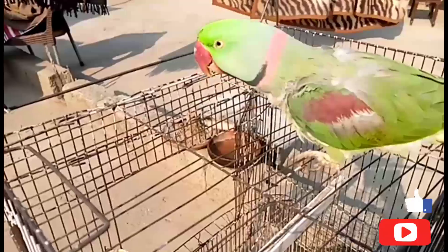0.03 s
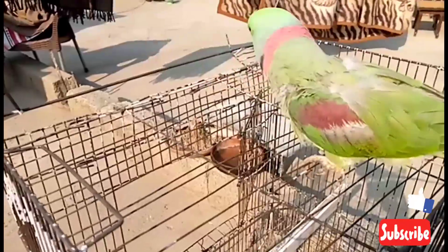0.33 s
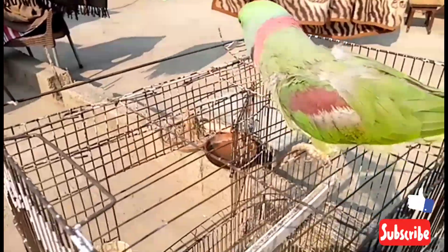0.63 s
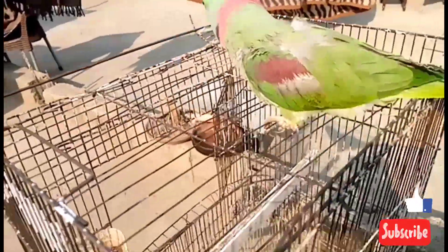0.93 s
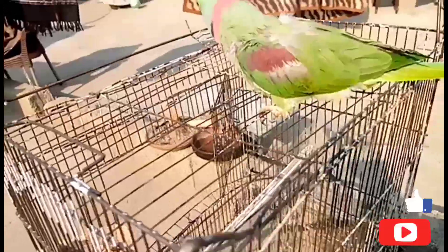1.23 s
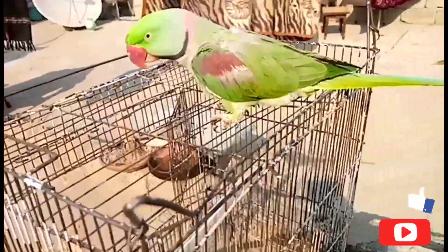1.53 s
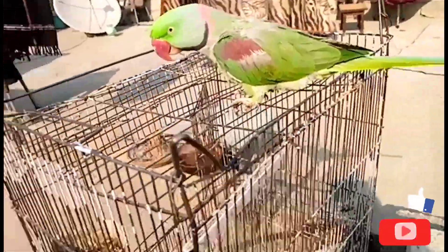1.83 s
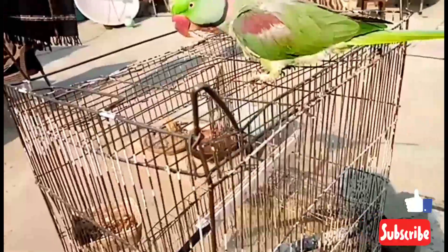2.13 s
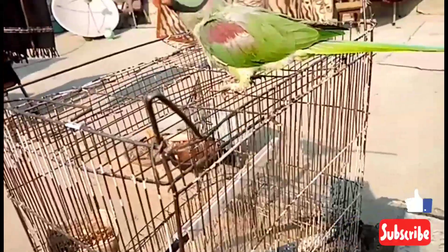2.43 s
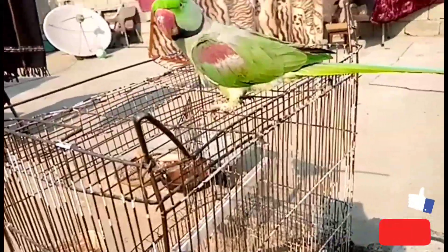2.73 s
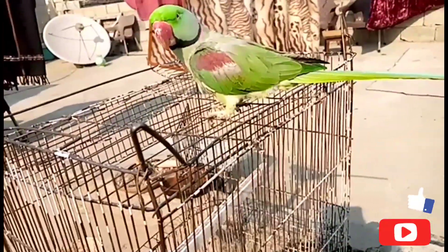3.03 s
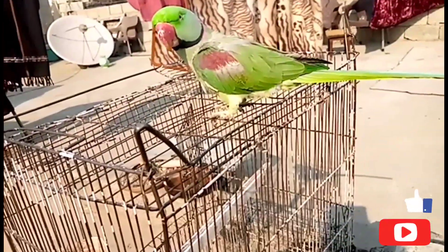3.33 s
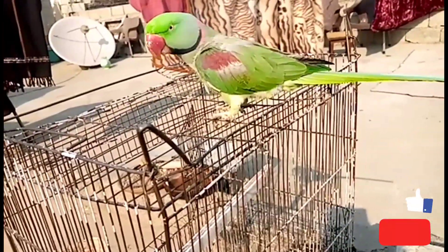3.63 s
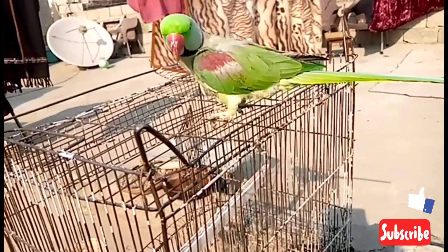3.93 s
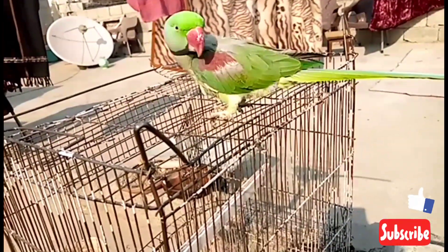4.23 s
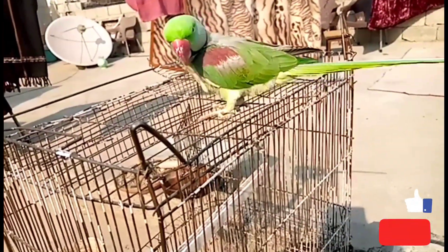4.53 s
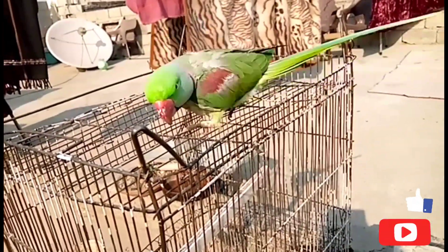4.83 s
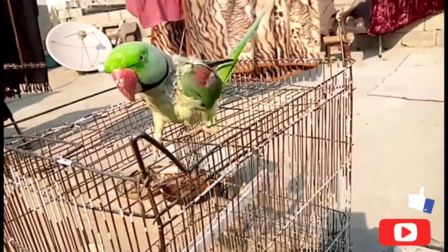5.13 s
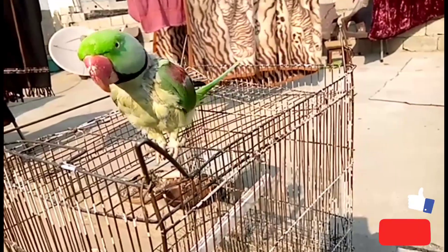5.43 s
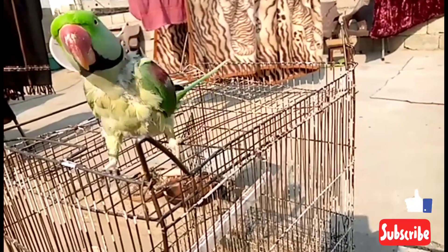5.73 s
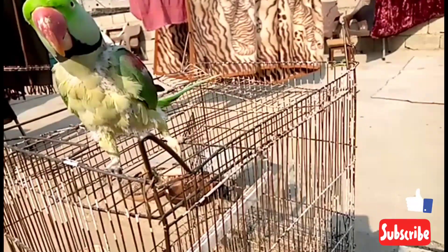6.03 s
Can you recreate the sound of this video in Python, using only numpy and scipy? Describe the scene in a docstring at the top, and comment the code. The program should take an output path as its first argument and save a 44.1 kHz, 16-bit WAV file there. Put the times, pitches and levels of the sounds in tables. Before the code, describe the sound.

A large parakeet calls close to the microphone in a quiet courtyard, louder on the right, with a short echo from the walls. Right at the start a brief high whistle breaks down into a rough note, with a soft, dull knock underneath. Four harsh squawks follow quickly until about 1.1 seconds, each rising and falling in pitch with raspy edges. Then there is only a faint outdoor hush and low distant rumble, with a barely audible knock near 2.6 seconds. At 3 seconds another whistle breaks downward and leads into three more squawks, ending around 3.8 seconds. At about 4.8 seconds the bird gives one lower, softer call, a croak that clears into a falling buzz. Around 5.5 seconds a claw faintly scrapes and plucks the cage wire, which pings and rattles briefly, leaving the hush until about 6 seconds.

```python
"""Caged parakeet in a courtyard

A large parakeet on a wire cage gives two runs of harsh squawks, then one lower falling call. Each run opens
with a whistle that breaks downward; each squawk is a pitch arch that starts and ends rough. The walls throw the
calls back, and they are louder in the right microphone port. Behind the bird lies an outdoor hush; twice the
microphone is softly bumped; at the end a claw plucks the cage wire."""
import sys
import numpy as np
from scipy import signal
from scipy.fft import rfft, irfft
from scipy.io import wavfile
from scipy.ndimage import uniform_filter1d, minimum_filter1d

SR = 44100
rng = np.random.default_rng(int(sys.argv[2]) if len(sys.argv) > 2 else 0)


def write(x):
    x = np.atleast_2d(x).T
    wavfile.write(sys.argv[1], SR, np.round(np.clip(x, -1, 1) * 32767).astype(np.int16))


N = 268480
HZ = np.fft.rfftfreq(N, 1 / SR)

# Spectrum of the outdoor background: frequency_hz, relative_density_db
HUSH_SPECTRUM = [(12, -37), (20, -15.5), (32, -22), (50, -12.5), (67, -3), (84, -7.5), (97, -17.5),
                 (175, -17), (211, -22.5), (324, -17.5), (632, -22), (1660, -23), (7820, -39.5),
                 (9950, -43), (12000, -48), (15600, -73.5), (22000, -120)]
# Soft knocks: start_s, level_db, corner_hz, left_vs_right_db
KNOCKS = [(.084, -39, 66.2, -14), (2.598, -59, 300, -14)]
# Left microphone port against the right: frequency_hz, gain_db
LEFT_PORT_RESPONSE = [(300, -11.5), (700, -10), (1300, -10.5), (2000, -15.5), (2800, -18.5), (3500, -15),
                      (4600, -19.5), (5600, -18), (6500, -11.5), (7500, -4.5), (8700, -3.5), (10000, 2),
                      (11000, -11.5)]
# Near reflections off floor, cage and furniture: delay_s, gain_db
NEAR_REFLECTIONS = [(.00208, -8), (.0029, -16), (.0039, -17.5), (.0072, -22.5), (0.0098, -24.5),
                    (0.017, -32.5)]
# Quick rattle of echoes round the cage: frequency_hz, t60_s
CAGE_DECAY = [(500, 0.047), (11000, 0.031)]
# Echoes off the courtyard walls: frequency_hz, t60_s
YARD_DECAY = [(500, 1), (2000, 0.49), (4000, 0.41), (7000, 0.23), (11000, 0.29)]
# Colour of both cage and courtyard echoes: frequency_hz, relative_db
ECHO_COLOUR = [(300, -4), (1500, 0.5), (2500, 8.5), (4000, 5), (5300, 5.5), (6500, 2.5), (11000, -7.5)]
# Resonances of a claw scraping the cage: centre_hz, width_hz, relative_db
SCRAPE_MODES = [(3124, 320, 1), (3880, 470, 5), (7260, 490, 2.5), (8330, 270, -15.5)]
# Resonances of the plucked wire: centre_hz, width_hz, relative_db
WIRE_MODES = [(3380, 67, -18), (4282, 85.5, -1), (5430, 128, -17), (7240, 300, -34), (8730, 250, -24),
              (9400, 200, -32)]
# Resonances of throat and wide-open beak: centre_hz, width_hz, relative_db
OPEN_BEAK_MODES = [(660, 130, -16.5), (1440, 1800, -11.5), (1860, 110, -9.5), (2665, 300, -2.5),
                   (3470, 130, -3.5), (4130, 400, -1), (4544, 55, 2.5), (6056, 270, -4.5), (6545, 200, 7),
                   (8473, 190, -17), (9485, 300, -18.5), (10823, 140, -13.5)]
# Resonances of throat and half-shut beak: centre_hz, width_hz, relative_db
HALF_SHUT_MODES = [(687, 160, -6.5), (1078, 620, -8.5), (1797, 435, -2.5), (2348, 267, -13),
                   (2750, 85, -14), (3420, 110, -12.5), (4210, 280, -1), (4624, 270, -10.5),
                   (5550, 535, -19.5), (7010, 156, 2.5), (10710, 303, -15.5)]
# Whistles that open each run: start_s, length_s, pitch_hz, level_db, treble_db, lead_in_s
OPENING_WHISTLES = [(0.06, 0.014, 3633, -4.5, -6, .026), (3.035, 0.022, 3538, -4, 1.5, 0.011)]
# Held notes the whistles break into:
# start_s, length_s, pitch_hz, level_db, accent_db, break_roughness, treble_db
BREAK_NOTES = [(0.075, .091, 1788, -15, 6.5, 0.5, 2), (3.06, 0.095, 1779, -13.5, 1, .4, 0.5)]
# Arched squawks:
# start_s, length_s, pitch_hz, arch_hz, level_db, accent_db, push_db, mid_roughness, treble_db
SQUAWKS = [(0.252, 0.12, 1972, 549.5, -16, 4, 2, 0.57, -5),
           (.456, 0.14, 1957, 307.7, -18.5, 7, 2.5, 0.28, -7.5),
           (0.684, 0.15, 1946, 266.1, -17, 5.5, 0, 0.09, -8),
           (0.914, 0.14, 1918, 244.7, -15.5, 2.5, 2, 0.29, -7.5),
           (3.241, 0.13, 1977, 453.8, -16, 4, -2, 0.5, -7.5),
           (3.453, 0.15, 1963, 239.5, -17.5, 5, 2.5, 0.22, -9),
           (3.691, 0.1483, 1951, 200, -14, 1.5, -5, 0.21, -8.5)]

# As the pressure runs out, held notes and squawks drop by this share of their pitch and fade.
END_DROP, END_FADE_S = .36, .015


def gain_of(db):
    """Decibels to gain."""
    return 10 ** (np.asarray(db) / 20)


def unit_rms(x):
    """Scales to rms 1."""
    return x / np.sqrt(np.mean(abs(x) ** 2) + 1e-20)


def steadied(x, span_s=0.021):
    """Holds the short-time level of x at 1, keeping its fast grain."""
    window = np.hanning(int(span_s * SR))
    return x / np.sqrt(signal.convolve(x ** 2, window / window.sum(), "same", "direct") + 1e-14)


def curve_at(points, hz):
    """Reads a table on a log-frequency axis."""
    frequency, value = np.transpose(points)
    return np.interp(np.log(hz + 1), np.log(frequency + 1), value)


def add(mix, start_s, sound):
    """Adds a sound to the mix at start_s."""
    part = mix[round(start_s * SR):][:len(sound)]
    part += sound[:len(part)]


def bell(t, width_s):
    """A smooth hump: 1 at t = 0, dying away on both sides."""
    return np.exp(-(t / width_s) ** 2)


def flutter(size, rate_hz):
    """Complex random wobble of rms about 1, mostly slower than rate_hz."""
    hz = np.fft.fftfreq(SR // 2, 1 / SR)
    spectrum = rng.standard_normal(len(hz)) + 1j * rng.standard_normal(len(hz))
    return unit_rms(np.fft.ifft(spectrum / (1 + (hz / rate_hz) ** 2)))[:size]


def minimum_phase(gain):
    """Impulse response of a passive body with the given gain per frequency."""
    log_gain = np.log(np.maximum(np.concatenate([gain, gain[-2:0:-1]]), 1e-5))
    return np.fft.ifft(np.exp(np.conj(signal.hilbert(log_gain)))).real[:len(gain) // 2]


def resonate(x, modes, bass_hz=400):
    """Rings the resonances of a beak or wire; almost nothing radiates in the bass."""
    hz = np.fft.rfftfreq(4096, 1 / SR)
    power = sum(gain_of(db) ** 2 / (1 + ((hz - centre) / (.78 * width)) ** 2) ** 2
                for centre, width, db in modes)
    gain = np.sqrt(power) * hz ** 2 / (hz ** 2 + bass_hz ** 2)
    return signal.fftconvolve(x, minimum_phase(gain))[:len(x)]


def outdoor_hush(left_db=-66.5, right_db=-68.5, common=0.18):
    """Quiet courtyard air with a low distant rumble, a little of it common to both ports."""
    noise = rng.standard_normal((3, N))
    hush = irfft(rfft(noise[:2] + common * noise[2]) * gain_of(curve_at(HUSH_SPECTRUM, HZ)), N)
    return unit_rms(hush) * gain_of([[left_db], [right_db]])


def soft_knocks(decay_s=0.024):
    """Dull knocks, mostly in the right port: bursts of low noise that die at once."""
    out, t = np.zeros((2, N)), np.arange(SR // 6) / SR
    for start_s, level_db, corner_hz, left_db in KNOCKS:
        envelope = np.exp(-t / decay_s) * np.minimum(1, t * corner_hz)
        knock = gain_of(level_db) * 2 * flutter(len(t), corner_hz).real * envelope
        add(out[0], start_s, gain_of(left_db) * knock)
        add(out[1], start_s, knock)
    return out


def low_recording_noise(bird, noise_db=-40, left_db=-11, corner_hz=110):
    """Faint low noise that swells with each loud call."""
    swell = np.sqrt(abs(uniform_filter1d(bird ** 2, size=600)))
    spectrum = rfft(rng.standard_normal((2, N))) / np.hypot(1, HZ / corner_hz) * (HZ < 900)
    return gain_of(noise_db) * swell * unit_rms(irfft(spectrum, N)) * gain_of([[left_db], [0]])


def echoes(x, decay, build_s, echoes_per_s=3000):
    """Scattered echoes reach each port, every band dying at its own speed."""
    taps = rng.standard_normal((2, SR)) * (rng.random((2, SR)) < echoes_per_s / SR)
    hz, t, bands = signal.stft(taps, SR, nperseg=256)
    band_db = curve_at(ECHO_COLOUR, hz)[:, None] - 60 * t / curve_at(decay, hz)[:, None]
    tail = signal.istft(bands * gain_of(band_db) * (1 - np.exp(-t / build_s)), SR, nperseg=256)[1]
    tail /= np.linalg.norm(tail, axis=1, keepdims=True)
    return signal.fftconvolve(x[None], tail, axes=1)[:, :N]


def near_spectrum(x, stretch=1):
    """Spectrum of x plus near reflections, which beat against its glides; stretch lengthens paths."""
    paths = sum(gain_of(db) * np.exp(-2j * np.pi * HZ * delay_s * stretch)
                for delay_s, db in NEAR_REFLECTIONS)
    return rfft(x) * (1 + paths)


def at_microphone(x, left_lead_s=.00023, cage_left_db=-10, cage_right_db=-15, yard_db=-22):
    """Bird and echoes at two ports; the left is duller in the mids, more diffuse, and hears first."""
    left = near_spectrum(x, stretch=1.04) * np.exp(2j * np.pi * HZ * left_lead_s)
    near = irfft(np.array([left, near_spectrum(x)]), N)
    cage = gain_of([[cage_left_db], [cage_right_db]]) * echoes(x, CAGE_DECAY, build_s=.006)
    ports = near + cage + gain_of(yard_db) * echoes(x, YARD_DECAY, build_s=.008)
    ports[0] = irfft(rfft(ports[0]) * gain_of(curve_at(LEFT_PORT_RESPONSE, HZ)), N)
    return ports


def claw_on_wire(scrape_s=.054, scrape_db=-58.5, attack_s=.0075,
                 pluck_s=.014, pluck_db=-52, rattle_s=.068, rattle_db=-53):
    """A claw scrapes along the cage and lets go of a wire, which pings and rattles out."""
    t = np.arange(SR // 2) / SR
    released_s = np.maximum(t - scrape_s, 0)
    grit = unit_rms(resonate(rng.standard_normal(len(t)), SCRAPE_MODES))
    scrape = grit * bell(t - scrape_s / 2, scrape_s / 2) * (1 - np.exp(-t / attack_s))
    wire = steadied(resonate(rng.standard_normal(len(t)), WIRE_MODES))
    ping = gain_of(pluck_db) * np.exp(-released_s / pluck_s)
    rattle = gain_of(rattle_db) * np.exp(-released_s / rattle_s)
    return gain_of(scrape_db) * scrape + (ping + rattle) * wire * (1 - np.exp(-released_s / attack_s))


def syrinx(hz, level_db, rough, treble_db, beak, root_db=0, odd_db=-3,
           jitter=.077, rasp_hz=380, hiss=.61, rough_scale=.69, treble_hz=5300):
    """The syrinx buzzes, wobbles and tips into chaos; the beak colours it; treble_db sets brightness."""
    size = len(hz)
    rough = np.clip(rough * rough_scale, .02, .98)
    tremble = 1 + .02 * rough * flutter(size, rate_hz=110).real
    hz = uniform_filter1d(hz, size=160, mode="nearest") * tremble
    phase = 2 * np.pi * np.cumsum(hz * (1 + jitter * rough * flutter(size, rate_hz=200).real)) / SR
    shared_rasp, buzz = flutter(size, rasp_hz).real, 0
    for k in np.arange(1, 25):
        # uneven cycles smear the harmonics into sidebands, the lowest ones least
        rasp = (0.27 * shared_rasp + 0.58 * flutter(size, rasp_hz)) * k / (k + 0.34)
        partial = ((np.sqrt(1 - rough ** 2) + rough * rasp) * np.exp(1j * k * phase)).real
        shimmer_db = 0.84 * flutter(size, rate_hz=68).real
        weight = gain_of(odd_db * (k % 2) + root_db * (k == 1) + shimmer_db)
        buzz = buzz + partial * weight * (k * hz < SR / 3)
    voice = resonate(unit_rms(buzz) + hiss * rough ** 2 * rng.standard_normal(size), beak)
    treble = signal.sosfiltfilt(signal.butter(6, treble_hz, "high", fs=SR, output="sos"), voice)
    bright = gain_of(treble_db)
    sound = (steadied(voice - treble) + bright * steadied(treble)) / np.hypot(1, bright)
    return gain_of(level_db) * sound * signal.windows.tukey(size, .055)


def low_call(length_s=.27, croak_s=.06, croak_hz=1000, slide_hz=1127, sag_hz_per_s=2660):
    """Beak half shut, a chaotic croak clears into a buzz that slides down to die on its fundamental."""
    t = np.arange(0, length_s, 1 / SR)
    remaining = length_s - t
    croak, ending = .5 - .5 * np.tanh((t - croak_s) / .007), bell(remaining, .0515)
    slide = (slide_hz - sag_hz_per_s * (t - croak_s)) * (1 - .5 * bell(remaining, .022))
    wander = croak_hz * (1 + .11 * flutter(len(t), rate_hz=127).real)
    hz = slide + (wander - slide) * croak
    level_db = -27 + 3 * croak - 16 * t - 24 * bell(t, .0014) - 19 * ending
    rough = .173 + .802 * croak + .194 * ending
    treble_db = -6 - 45 * t
    root_db = -5 * croak + 13 * bell(remaining, .049)
    return syrinx(hz, level_db, rough, treble_db, HALF_SHUT_MODES, root_db,
                  odd_db=1.5, jitter=.055, rasp_hz=200, hiss=.051, rough_scale=1)


def whistle(length_s, pitch_hz, level_db, treble_db, lead_s, sag_hz_per_s=18000):
    """A clean high note swells out of nothing, sags, and chokes just before it breaks."""
    t = np.arange(-lead_s, length_s, 1 / SR)
    lead, choke = np.maximum(-t / lead_s, 0) ** 0.99, np.maximum(t / length_s, 0) ** 3
    hz = pitch_hz - sag_hz_per_s * t
    envelope_db = level_db - 61 * lead - 22.5 * choke
    rough = .071 + .28 * choke
    return syrinx(hz, envelope_db, rough, treble_db - 12 * lead, OPEN_BEAK_MODES, odd_db=1)


def held_note(length_s, pitch_hz, level_db, accent_db, break_rough, treble_db,
              break_hz=543, break_s=.015, sag_hz_per_s=1300):
    """The voice breaks roughly downward, settles on a cleaner tone and runs out."""
    t = np.arange(0, length_s, 1 / SR)
    remaining = length_s - t
    accent, ending = bell(t - .009, .0074), bell(remaining, END_FADE_S)
    hz = pitch_hz + break_hz * bell(t, break_s) - sag_hz_per_s * t
    hz *= 1 - END_DROP * bell(remaining, .014)
    envelope_db = level_db + accent_db * accent - 20 * ending
    rough = .062 + break_rough * bell(t, .063) + .85 * bell(remaining, .0073)
    bright_db = treble_db - 6 * (accent + ending)
    return syrinx(hz, envelope_db, rough, bright_db, OPEN_BEAK_MODES, odd_db=-3.44, hiss=.35)


def arched_squawk(length_s, pitch_hz, arch_hz, level_db, accent_db, push_db, mid_rough, treble_db,
                  arch_at_s=.04, sag_hz_per_s=4300, scoop=.78, scoop_s=.015, attack_s=.0068,
                  edge_rough=1.05, bright_at_s=.079):
    """The voice scoops up from a rasp, arches, brightens as it sags and collapses into rasp."""
    t = np.arange(0, length_s, 1 / SR)
    remaining = length_s - t
    opening, arch, closing = bell(t, .018), bell(t - arch_at_s, .015), bell(remaining, .022)
    hz = pitch_hz + arch_hz * arch - sag_hz_per_s * t
    hz *= (1 - scoop * bell(t, scoop_s)) * (1 - END_DROP * bell(remaining, .021))
    # an accent on the arch, then a last push (or dip) just before the end
    swells_db = accent_db * bell(t - arch_at_s, .04) + push_db * bell(remaining - .021, .0088)
    fades_db = -25.5 * np.exp(-t / attack_s) - 16.5 * bell(remaining, END_FADE_S)
    rough = mid_rough + (edge_rough - mid_rough) * (opening + closing)
    bright_db = treble_db + 2 * opening - 4 * arch + 11 * bell(t - bright_at_s, .024) - 3 * closing
    root_db = 5.5 * bell(t, scoop_s / 2)  # the fundamental is stronger at the foot of the scoop
    return syrinx(hz, level_db + swells_db + fades_db, rough, bright_db, OPEN_BEAK_MODES, root_db)


def scene(low_call_at_s=4.76, claw_at_s=5.502, wire_left_db=-4, wire_yard_db=-9):
    """The courtyard from the microphone: the bird, its claw on the cage, echoes and background."""
    bird, wire = np.zeros(N), np.zeros(N)
    for start_s, *shape, lead_s in OPENING_WHISTLES:
        add(bird, start_s - lead_s, whistle(*shape, lead_s))
    for start_s, *shape in BREAK_NOTES:
        add(bird, start_s, held_note(*shape))
    for start_s, *shape in SQUAWKS:
        add(bird, start_s, arched_squawk(*shape))
    add(bird, low_call_at_s, low_call())
    add(wire, claw_at_s, claw_on_wire())
    wire_echoes = gain_of(wire_yard_db) * echoes(wire, YARD_DECAY, build_s=.0048)
    cage = gain_of([[wire_left_db], [0]]) * wire + wire_echoes
    return at_microphone(bird) + low_recording_noise(bird) + cage + soft_knocks() + outdoor_hush()


def record(dry, ceiling=0.81, cutoff_hz=11400):
    """Behind the microphone, a fast limiter holds the loudest peaks and a low-pass trims the top."""
    needed_gain = minimum_filter1d(np.minimum(1, ceiling / (abs(dry).max(0) + 1e-9)), size=161)
    limited = dry * uniform_filter1d(uniform_filter1d(needed_gain, size=81), size=81)
    low_pass = signal.firwin(255, cutoff_hz, window=("kaiser", 9), fs=SR)
    return signal.oaconvolve(limited, low_pass[None], "same")


dry = scene()
out = record(dry)
write(out)
```